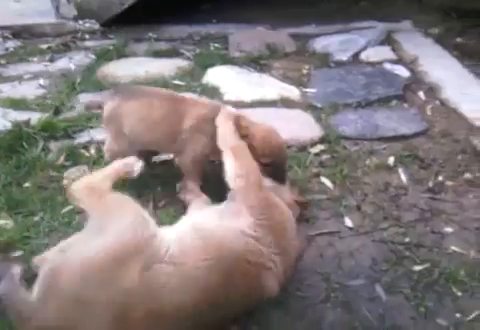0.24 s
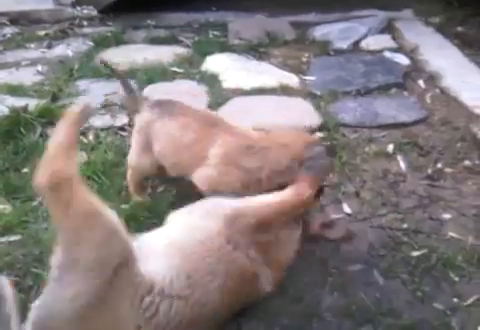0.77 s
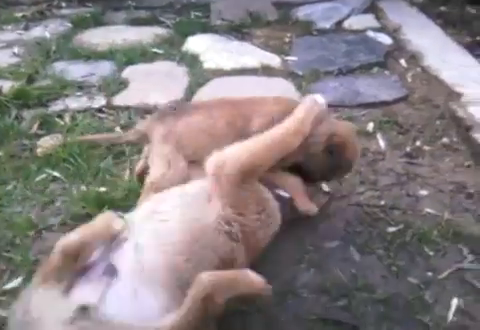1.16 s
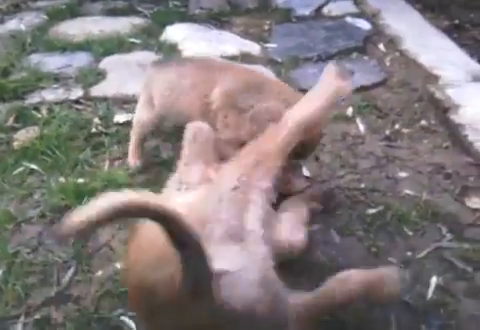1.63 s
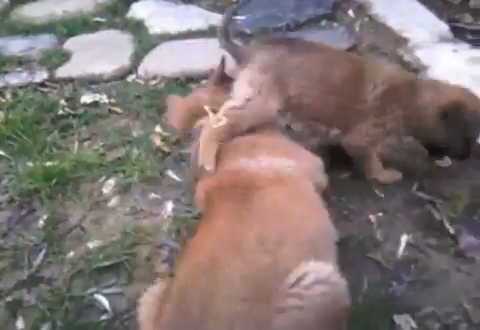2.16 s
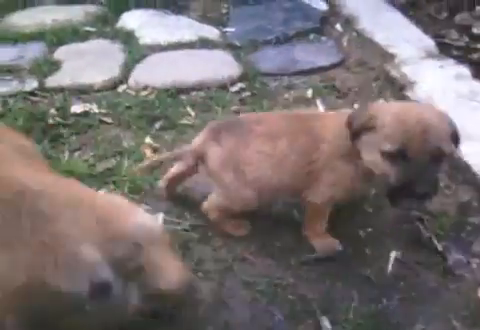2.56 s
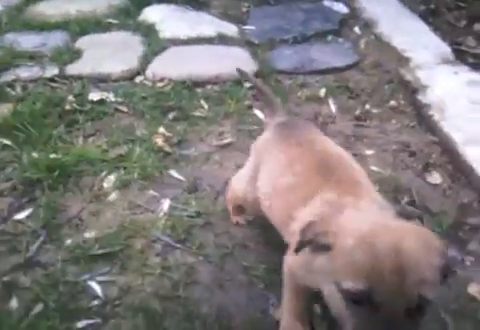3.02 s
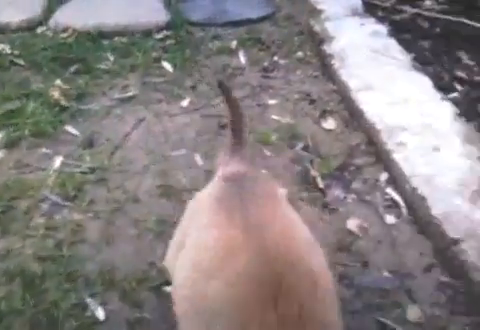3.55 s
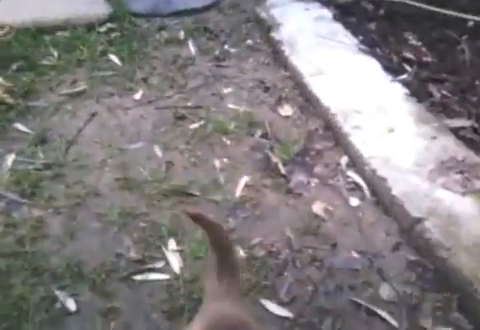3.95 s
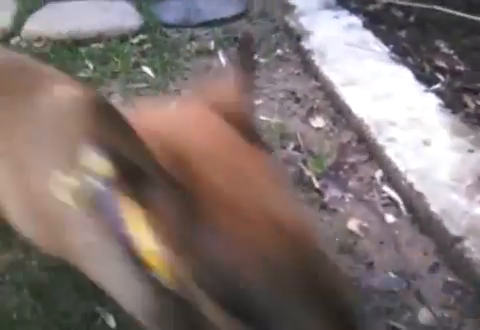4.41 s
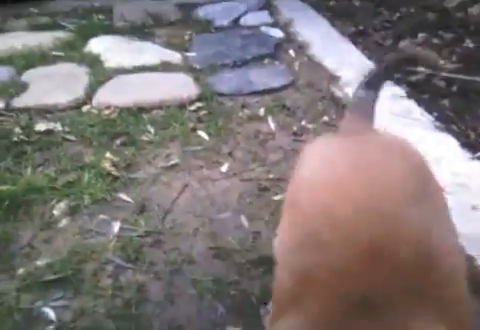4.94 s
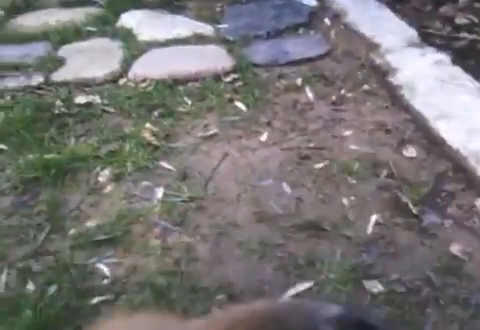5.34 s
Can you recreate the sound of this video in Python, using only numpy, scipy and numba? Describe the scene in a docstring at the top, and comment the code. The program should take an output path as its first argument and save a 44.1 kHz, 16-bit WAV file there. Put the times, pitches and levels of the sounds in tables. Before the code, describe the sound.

A puppy close by yips, snarls and grunts in a scuffle, while a bigger dog gives four echoing barks in a walled yard.

```python
"""Shrill yips come first: a puppy close by yips, snarls and grunts while wrestling on grass in a walled yard.
A bigger dog answers with four barks, more of the yard around it, echoes hanging between the walls.
Voices are fold pulses and breath through moving resonances; paws rustle as dense crackles; far birds are
wavering tones and open air is shaped noise. A narrow-band mono recorder overloads on loud calls."""
import sys
import numpy as np
from scipy import signal
from scipy.fft import rfft, irfft
from scipy.io import wavfile
from scipy.ndimage import uniform_filter1d
from numba import njit

SR = 44100
rng = np.random.default_rng(int(sys.argv[2]) if len(sys.argv) > 2 else 0)


def volts_from_db(level):
    """Convert decibel levels to linear amplitude ratios."""
    exponent = np.asarray(level, float) / 20
    return 10 ** exponent


def master(y):
    """Save y as 16-bit WAV."""
    cut = np.clip(np.atleast_2d(y).T, -1, 1)
    pcm = np.round(cut * 32767)  # scale
    wavfile.write(sys.argv[1], SR, pcm.astype(np.int16))


N = 246078   # samples
T = np.arange(N) / SR   # time [s]

# open air: (frequency [Hz], relative density [dB per Hz])
AIR_COLOUR = [(24, -59.5), (40, -18), (86, -10.5), (218, -18), (254, -14.5), (351, -16.5), (524, -15.5),
              (2230, -17.5), (3520, -27), (3800, -37), (4940, -79), (8360, -120)]
AIR_DB = -52   # typical level

# far birds, one list each: (time [s], pitch [Hz], level [dB])
BIRD_CALLS = [
    [(4.93, 3000, -52), (4.965, 3330, -40), (4.985, 3520, -46)],
    [(5.01, 3450, -50), (5.12, 3300, -48), (5.24, 3450, -49)],
    [(4.95, 2750, -51), (5.1, 2750, -48), (5.2, 2780, -46), (5.3, 2800, -43)],
]

# paws and fur on grass, one list each: (time [s], level [dB])
RUSTLE_LEVELS = [
    [(2.5, -38.5), (2.63, -48), (2.76, -34.5), (2.81, -44), (2.98, -56.5), (3.07, -44), (3.3, -62)],
    [(4.0, -42.5), (4.4, -54), (4.54, -55), (4.71, -46.5), (4.735, -39), (4.82, -39.5), (4.87, -46),
     (5.05, -45.5), (5.23, -51.5), (5.25, -63)],
]
# colour of the crackles: (frequency [Hz], relative density [dB per Hz])
RUSTLE_COLOUR = [(120, -54), (200, -14.5), (498, -23), (577, -22.5), (1160, -12), (1810, -5), (3490, -11),
                 (3800, -14), (4940, -22), (8360, -120)]

# lone dry ticks nearby: (time [s], peak level [dB])
NEARBY_TICKS = [(4.674, -33), (4.696, -31), (4.728, -32), (4.936, -31), (5.056, -33)]

# wall reflections: (delay [s], level before each dog's own offset [dB])
WALL_ECHOES = [(.045, -18), (0.096, -11.5), (.15, -14)]
YARD_T60_S, NEAR_T60_S, YARD_CUT_HZ = 0.65, 0.38, 4500

# barks: (start [s], mouth closes [s], end [s], base level [dB], top pitch [Hz], top reached [s],
# sag after closing [dB], scale of the strong-weak pulse pattern [0-1])
BARKS = [(.478, .528, .638, -13.5, 515, .545, -2, .7), (1.675, 1.716, 1.803, -4, 598, 1.76, -1, .15),
         (3.622, 3.678, 3.762, -6, 565, 3.682, -2, .4), (5.3, 5.362, 5.428, -4, 575, 5.348, -5, .4)]
# course of every bark: (stage [0 start, 1 mouth closes, 2 end], level re base [dB], overtones [dB])
BARK_COURSE = [(0, -26.5, 1), (.3, -11, 2), (.7, -8, 6.5), (.92, -4.5, 2.5), (1.05, 1, -9),
               (1.301, -1, -7.5), (1.599, -1.5, 2), (1.85, 0, -7.5), (2, -6, 12)]
# hoarseness along a bark: (stage [0-2], roughness [0-1], share of the strong-weak pattern [factor])
BARK_HOARSENESS = [(0, .5, .2), (.5, .28, .3), (.9, .42, 1.4), (1.1, .18, .6), (1.5, .22, 1),
                   (1.7, .4, 1.3), (2, .5, 1)]
# upper resonances of the big muzzle: (centre [Hz], width [Hz], level [dB])
BARK_MUZZLE = [(1650, 290, 0.5), (3130, 280, -10), (3190, 900, -15.5)]
BARK_THROAT_HZ, BARK_THROAT_WIDTH_HZ, BARK_MOUTH_HZ = 519, 378, 945
BARK_START_SHARE, BARK_RISE_BEND = .64, 1.4   # pitch starts at this share of the top and eases into it

# puppy calls, one curve each: (time [s], pitch [Hz], level [dB], mouth resonance [Hz])
YIPS = [
    [(0.0, 982.5, -3, 2070), (0.014, 1062, -7, 2380), (0.034, 930, -5, 2100), (0.046, 759.5, -7, 1650),
     (0.075, 728.8, -7.5, 1650), (0.11, 742.3, -18, 1650)],
    [(0.135, 603.8, -11, 1760), (0.155, 637.6, -8, 1770), (0.2, 735.3, -6, 1650), (0.222, 824, -5.5, 1680),
     (0.244, 861, -7.5, 1814), (0.264, 816, -5.5, 1755), (0.282, 700.4, -6, 1482), (0.31, 702, -10, 1422),
     (0.326, 728, -20, 1470)],
    [(0.35, 693, -21, 1518), (0.414, 590, -13.5, 1420), (0.46, 591.4, -38.5, 1600)],
    [(0.69, 697, -31, 1860), (0.714, 703, -25, 1780), (0.755, 700, -34, 2000)],
    [(0.796, 855.8, -11.5, 1535), (0.82, 863, -4.5, 1513), (0.842, 775, -3.5, 1540),
     (0.862, 799.7, -6, 1510), (0.906, 751.6, -6, 1730), (0.92, 746.6, -15, 1850)],
    [(0.95, 732.8, -14.5, 2064), (0.97, 751.3, -8.5, 1940), (1.0, 703, -6.5, 1790),
     (1.036, 780.6, -5, 1976), (1.09, 777.4, -7, 1940), (1.12, 717, -15, 1975)],
    [(1.18, 392.3, -20, 1900), (1.208, 389, -7, 1907), (1.248, 378, -6.5, 1884), (1.28, 384.6, -19, 1950)],
    [(1.386, 381.2, -16, 1958), (1.412, 394.5, -19, 1825), (1.435, 372.5, -37.5, 1971)],
    [(2.094, 913, -13, 1805), (2.107, 819, -6.5, 1738), (2.124, 884, -8.5, 1762), (2.141, 897, -11, 1803),
     (2.158, 803.2, -5, 1685), (2.17, 670, -6.5, 1609), (2.18, 564.2, -7.5, 1650), (2.192, 602.4, -9, 1720),
     (2.22, 576, -25, 1825)],
    [(2.272, 310.4, -17.5, 1504), (2.288, 364.5, -8.5, 1429), (2.3, 412.6, -8.5, 1237),
     (2.325, 455.2, -7, 1150), (2.347, 463, -6.5, 1197), (2.359, 453.2, -8, 1404), (2.372, 411, -7.5, 1460),
     (2.386, 351.7, -5.5, 1332), (2.408, 308, -19, 1314)],
]
# stretches where the hoarse voice clears: (from [s], to [s], roughness [0-1])
YIP_CLEAR = [(0, .032, .15), (.205, .275, .2), (.815, .885, .6), (1.0, 1.08, .5), (1.195, 1.27, .6),
             (1.39, 1.43, .6), (2.09, 2.158, .25), (2.312, 2.388, .33)]
# upper resonance in each clear stretch, in the same order: level [dB]
CLEAR_UPPER_DB = [-8.5, -8.5, -16, -15.5, -5, -23, -0.5, -3.5]
YIP_HOARSE, YIP_CLEAR_FADE_S, HOARSE_UPPER_DB = .85, .018, -19.5   # outside the clear stretches; fade at their ends
# a narrower mouth lets the throat ring: (mouth resonance [Hz], throat level [dB])
THROAT_BY_MOUTH = [(1200, 2), (1500, -10.5), (1750, -14.5), (2100, -13.5)]
# tract resonance that stays put: (centre [Hz], width [Hz], level [dB])
YIP_TOP_RESONANCE = (3430, 83, -14.5)
# low grunts: (time [s], pitch [Hz], level [dB], roughness [0-1], mouth resonance [Hz])
GRUNTS = [
    [(1.5, 109.6, -37.5, 0.61, 450), (1.56, 101.1, -40, 0.06, 467.5), (1.62, 86.7, -32.5, 0.23, 558),
     (1.67, 85.8, -38.5, 0, 588)],
    [(3.04, 249, -41, 0.27, 312.6), (3.08, 270, -33.5, 0.2, 325), (3.11, 263, -40, 0.43, 317),
     (3.14, 245.2, -42.5, 0.31, 290)],
]
# throat in the grunts: (centre [Hz], width [Hz], level [dB])
GRUNT_THROAT = [(770, 1700, 1.5), (1350, 1080, 1), (2000, 51, -24)]
# runs of dry snaps of the folds: (start [s], gap [s], count)
CREAK_RUNS = [(.312, .0145, 9), (2.7215, .0133, 6)]
# mid-run level of each creak run, before chance: level [dB]
CREAK_DB = [-11.5, -18.5]
CREAK_EDGE_DB = -4.5   # change at both ends of a run
# small cavity that snaps ring in, passed twice: (centre [Hz], width [Hz], level in one pass [dB])
SNAP_CAVITY = [(1406, 240, 4.5), (2350, 570, -1), (3520, 220, 0.5), (450, 290, -8)]

# stretches where the sound above a frequency is nearly or partly lost, each just before a sudden call:
# (from [s], to [s], above frequency [Hz], level of what is left [dB])
DROPOUTS = [(0.765, 0.778, 900, -45), (2.053, 2.073, 1300, -48), (3.583, 3.609, 30, -43),
            (5.257, 5.277, 100, -10.5)]
BAND_HZ, CEILING = 3680, .735   # recorder's upper band edge, and overload limit in full scale


def rms_one(x):
    """Scaled to rms 1."""
    return x / np.sqrt(np.mean(x ** 2) + 1e-20)


def drift(rate):
    """Smooth chance, noise low-passed at about this many turns a second; rms 1."""
    r = np.exp(-2 * np.pi * rate / SR)
    settled = signal.lfilter([1], [1, -2 * r, r * r], rng.standard_normal(N + 8000))[8000:]
    return rms_one(settled)


def gate(start, end, fade):
    """1 between the two times, straight fades outside."""
    return np.interp(T, [start - fade, start, end, end + fade], [0, 1, 1, 0])


def played(tables, level_column, fade=0.033):
    """Columns of all calls along time; the level column becomes a gain that is silent between calls."""
    s, *columns = np.transpose(np.concatenate(tables))
    curves = [np.interp(T, s, c) for c in columns]
    sounding = np.minimum(sum(gate(rows[0][0], rows[-1][0], fade) for rows in tables), 1)
    curves[level_column] = sounding * volts_from_db(curves[level_column])
    return curves


@njit
def resonate(x, hz, r, rate):
    """Two-pole resonator, gain 1 on top."""
    out = np.zeros(len(x) + 2)
    for i in range(len(x)):
        feed = (1 - r[i] * r[i]) / 2 * (x[i] - x[max(i - 2, 0)])
        out[i + 2] = feed + 2 * r[i] * np.cos(2 * np.pi * hz[i] / rate) * out[i + 1] - r[i] * r[i] * out[i]
    return out[2:]


def peak(x, hz, width):
    """A resonance whose centre and width [Hz] may move."""
    radius = np.exp(-np.pi * np.maximum(width, 50) / SR)
    return resonate(x, hz + np.zeros(N), radius + np.zeros(N), float(SR))


def throat(x, modes):
    """Resonances side by side, signs alternating."""
    return sum((-1) ** k * volts_from_db(db) * peak(x, hz, width) for k, (hz, width, db) in enumerate(modes))


def coloured(x, spectrum):
    """Shaped by (frequency [Hz], level [dB]) points on a log frequency axis; rms 1."""
    hz = np.maximum(np.arange(N // 2 + 1) * SR / N, 1)
    point_hz, point_db = np.transpose(spectrum)
    gain_db = np.interp(np.log(hz), np.log(point_hz), point_db)
    return rms_one(irfft(rfft(x) * volts_from_db(gain_db), N))


def voice(pitch_hz, gain, rough, tract, tilt, jitter, first_db, uneven=0):
    """Fold pulses (harmonics to 4200 Hz) and breath noise gated each cycle, through the tract."""
    pitch_hz = uniform_filter1d(pitch_hz, size=500) * (1 + jitter * rough * drift(150))
    phase = 2 * np.pi * np.cumsum(pitch_hz) / SR
    pulses = np.zeros(N)
    for k in range(1, 40):
        if k * pitch_hz.min() < 4200:
            in_band = k * pitch_hz < 4200
            pulses += np.cos(k * phase + 0.56 * (k * k - 1)) * in_band / k ** tilt
    pulses -= (1 - volts_from_db(first_db)) * np.cos(phase)   # sets how well the head radiates the lowest partial
    pulses *= 1 + uneven * np.cos(phase / 2)        # every second pulse weaker: lines halfway between
    shimmer = volts_from_db(rough * drift(100))               # uneven closing of the folds
    breath = rng.standard_normal(N) * (1 + 0.71 * np.cos(phase)) * np.sqrt(SR / 8 / pitch_hz)
    sound = tract(shimmer * (np.sqrt(1 - rough) * pulses + rough * breath))
    evened = sound / np.sqrt(uniform_filter1d(sound ** 2, size=600) + 1e-12)
    return gain * evened


def snaps(times, peaks_db):
    """Single clicks ringing in a small cavity."""
    impulse = (T == 0) + 1e-18
    ring = throat(throat(impulse, SNAP_CAVITY), SNAP_CAVITY)[:SR // 10]
    clicks = np.zeros(N)
    clicks[np.round(np.asarray(times) * SR).astype(int)] = volts_from_db(np.asarray(peaks_db))
    return signal.fftconvolve(clicks, ring / np.abs(ring).max())[:N]


def open_air():
    """Shaped noise whose level wavers slightly."""
    return volts_from_db(AIR_DB + 0.4 * drift(12)) * coloured(rng.standard_normal(N), AIR_COLOUR)


def yard(x, t60, tail_db, echo_db):
    """A few wall echoes and a scattered tail that dies away, both dulled, added to the direct sound."""
    t = T[:SR]
    answer = rng.standard_normal(SR) * volts_from_db(-60 * t / t60) * np.minimum(t / 0.038, 1)
    answer *= volts_from_db(tail_db) / np.sqrt(np.sum(answer ** 2))
    for delay, db in WALL_ECHOES:
        answer[round(delay * SR)] += volts_from_db(db + echo_db)
    stirred = np.interp(T + .0004 * drift(25), T, x)   # moving air and leaves blur the pitch of reflections
    wet = signal.fftconvolve(stirred, answer)[:N]
    return x + signal.sosfilt(signal.butter(1, YARD_CUT_HZ, fs=SR, output="sos"), wet)


def birds():
    """Far-off whistles: sines wavering in pitch and level, smeared by distance."""
    out = 0
    for call in BIRD_CALLS:
        pitch, gain = played([call], level_column=1, fade=0.054)
        phase = 2 * np.pi * np.cumsum(pitch * (1 + .02 * drift(120))) / SR
        out = out + gain * volts_from_db(2.5 * drift(60)) * np.sin(phase)
    return out


def rustle():
    """Paws on grass: dense small crackles, about 2500 a second, of chance strength and sign."""
    gain, = played(RUSTLE_LEVELS, level_column=0, fade=0.15)
    struck = rng.random(N) < 2500 / SR
    strength = volts_from_db(3.7 * np.minimum(rng.exponential(1, N), 4))
    grains = struck * strength * rng.choice([-1, 1], N)
    return gain * coloured(grains, RUSTLE_COLOUR)


def nearby_ticks():
    """Lone dry clicks, with no yard around them."""
    return snaps(*np.transpose(NEARBY_TICKS))


def big_dog():
    """Overtones burst in with the mouth wide, sink onto the throat as it closes, and return at the end."""
    stage, level_db, opening_db = np.transpose(BARK_COURSE)
    at, hoarse, pattern = np.transpose(BARK_HOARSENESS)
    calls = []
    for start, closes, end, base_db, top_hz, top_s, sag_db, weak in BARKS:
        s = np.interp(stage, [0, 1, 2], [start, closes, end])
        to_go = np.clip((top_s - s) / (top_s - start), 0, 1) ** BARK_RISE_BEND
        pitch_hz = top_hz * (1 - (1 - BARK_START_SHARE) * to_go)
        call_db = base_db + level_db + sag_db * np.maximum(stage - 1, 0)
        rough = np.interp(stage, at, hoarse)
        uneven = weak * np.interp(stage, at, pattern)
        calls.append(np.transpose([s, pitch_hz, call_db, opening_db, rough, uneven]))
    pitch, gain, open_db, rough, uneven = played(calls, level_column=1, fade=0.014)

    def tract(x):
        x = signal.sosfilt(signal.butter(2, 330, "high", fs=SR, output="sos"), x)
        mouth = peak(x, BARK_MOUTH_HZ, 430) - throat(x, BARK_MUZZLE)
        return peak(x, BARK_THROAT_HZ, BARK_THROAT_WIDTH_HZ) - volts_from_db(open_db) * mouth

    return voice(pitch, gain, rough, tract, tilt=1.0, jitter=.06, first_db=2.5, uneven=np.clip(uneven, 0, 1))


def creaks():
    """Slow uneven snaps of the folds, weaker towards both ends of a run."""
    out = 0
    for (start, gap, count), db in zip(CREAK_RUNS, CREAK_DB):
        run = np.arange(count)
        chance = rng.uniform(-1, 1, (count, 2)).T * (run > 0)   # the first snap is left as it is
        times = start + gap * (run + .12 * chance[0])
        edge_db = CREAK_EDGE_DB * (2 * run / run[-1] - 1) ** 2
        out = out + snaps(times, db + 4 * chance[1] + edge_db)
    return out


def grunts():
    """Low rough fold pulses through a mouth resonance and the throat."""
    pitch, gain, rough, mouth = played(GRUNTS, level_column=1, fade=0.0069)

    def tract(x):
        return peak(x, mouth, 210) + throat(peak(x, 1100, 1000), GRUNT_THROAT)

    return voice(pitch, gain, np.clip(rough, 0, 1), tract, tilt=0.8, jitter=0.19, first_db=-10.5)


def yips():
    """Shrill calls that break between clear arcs and hoarse snarls as the mouth resonance moves."""
    pitch, gain, mouth = played(YIPS, level_column=1, fade=0.0068)
    hoarse, upper_db = YIP_HOARSE, HOARSE_UPPER_DB
    for (start, end, rough), clear_db in zip(YIP_CLEAR, CLEAR_UPPER_DB):
        clear = gate(start, end, YIP_CLEAR_FADE_S)
        hoarse = hoarse - (YIP_HOARSE - rough) * clear
        upper_db = upper_db + (clear_db - HOARSE_UPPER_DB) * clear
    low_ring = volts_from_db(np.interp(mouth, *np.transpose(THROAT_BY_MOUTH)))

    def muzzle(x):
        steep = peak(peak(x, mouth, 850), mouth, 580)
        upper = volts_from_db(upper_db) * peak(peak(x, 2840, 390), 2840, 390)
        return steep - upper + low_ring * peak(x, 950, 1200) - throat(x, [YIP_TOP_RESONANCE])

    # a small head radiates the lowest partial poorly
    return voice(pitch, gain, hoarse, muzzle, tilt=0.19, jitter=0.065, first_db=-8)


def puppy():
    """One small throat: yips and snarls, with grunts and creaks."""
    return yips() + grunts() + creaks()


def scene():
    """Puppy close, big dog with more of the yard around it, ticks, rustle, birds and open air; mono."""
    far_dog = yard(big_dog(), YARD_T60_S, tail_db=-6.0, echo_db=-8.0)
    close_puppy = yard(puppy(), NEAR_T60_S, tail_db=-9.0, echo_db=-24.5)
    mix = open_air() + birds() + rustle() + nearby_ticks() + far_dog + close_puppy
    return mix[None]


def drop_out(dry):
    """For a few hundredths of a second before sudden calls, the sound above a given frequency is turned down."""
    x = dry.copy()
    for start, end, above_hz, db in DROPOUTS:
        low = signal.sosfiltfilt(signal.butter(4, above_hz, fs=SR, output="sos"), dry)
        x = x - (1 - volts_from_db(db)) * gate(start, end, 0.0099) * (dry - low)
    return x


def overload(x):
    """The recorder's limit: straight up to the knee, rounded above it; distortion spreads above the band."""
    knee = .85 * CEILING
    room = CEILING - knee
    excess = np.maximum(np.abs(x) - knee, 0)
    return np.clip(x, -knee, knee) + np.sign(x) * room * np.tanh(excess / room)


def top_cut(x):
    """Nothing passes above the cut-off."""
    return signal.sosfilt(signal.butter(12, 15730, fs=SR, output="sos"), x)


def record(dry):
    """The dropouts, then a narrow-band recorder: a steep telephone-band cut and overload."""
    x = drop_out(dry)
    x = signal.sosfilt(signal.ellip(12, .5, 85, BAND_HZ, fs=SR, output="sos"), x)
    x = overload(x)
    return top_cut(x)


dry = scene()
out = record(dry)
master(out)
```